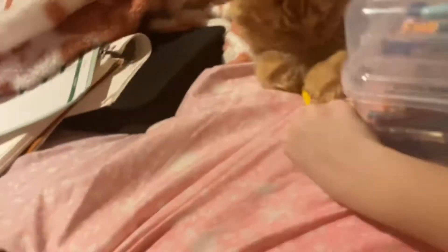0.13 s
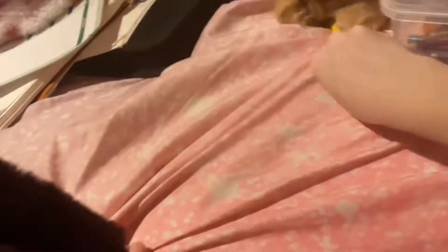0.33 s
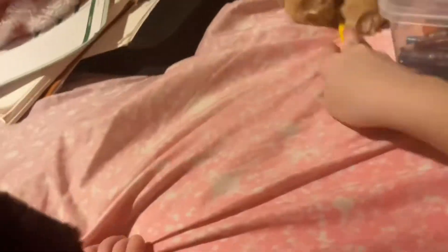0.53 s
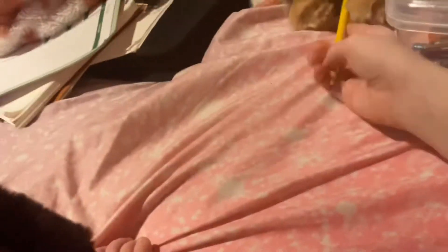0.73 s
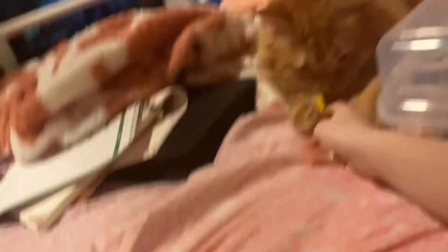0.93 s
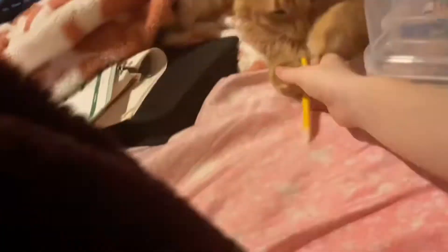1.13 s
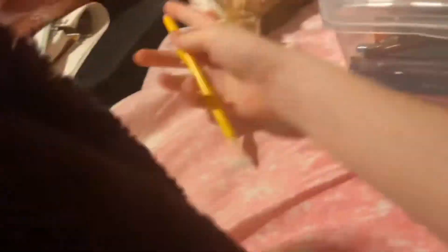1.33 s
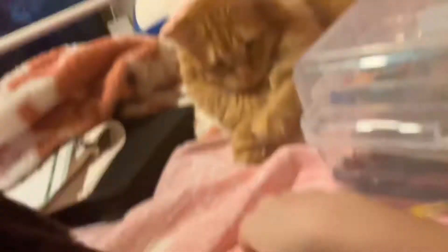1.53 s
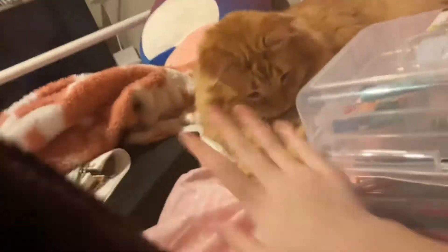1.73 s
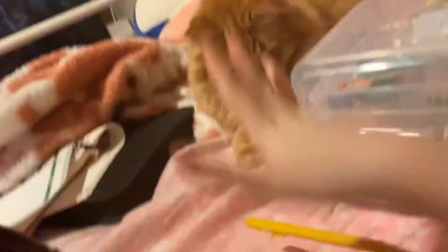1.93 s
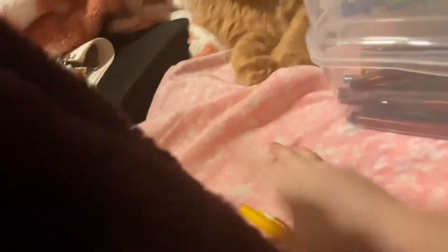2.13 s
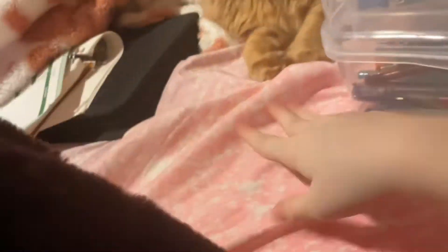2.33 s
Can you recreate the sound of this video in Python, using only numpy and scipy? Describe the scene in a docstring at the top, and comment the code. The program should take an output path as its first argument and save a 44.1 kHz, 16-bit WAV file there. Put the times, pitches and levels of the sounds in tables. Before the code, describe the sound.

A cat chirps twice amid hollow pops, soft pats and rustling bedding.

```python
"""A quiet bedroom with a faint hum, the microphone close to a cat on the bed. A hand and paws rustle
over the cloth after a pencil, with small clicks and hollow pops. Half a second in come the loudest pop
and a pat, then a bright swish and the cat's first whistle-like chirp, rising and falling. More pats,
pops and light swishes lead to a second, louder chirp at 1.7 s. The last soft pats land in the bedding
and the rustle dies away."""
import sys
import numpy as np
from scipy import signal
from scipy.fft import rfft, irfft
from scipy.io import wavfile

SR = 44100
rng = np.random.default_rng(int(sys.argv[2]) if len(sys.argv) > 2 else 0)


def file_out(sig):
    """Save sig as 16-bit WAV at sys.argv[1]."""
    # one column per channel
    cols = np.atleast_2d(sig).T
    # limit, then scale
    lim = np.clip(cols, -1, 1)
    pcm = np.round(lim * 32767).astype(np.int16)
    wavfile.write(sys.argv[1], SR, pcm)


N = 109941
T = np.arange(N) / SR

# The cat's two calls, close up: time_s, pitch_hz, level_db
FIRST_CHIRP = [(0.568, 1290, -50), (0.577, 1493, -44), (0.585, 1820, -43.5), (0.594, 1662, -28.5),
               (0.602, 1615, -28.5), (0.613, 1413, -31.5), (0.627, 1053, -45.5), (0.641, 1016, -42),
               (0.668, 1040, -67)]
SECOND_CHIRP = [(1.681, 1030, -43), (1.693, 1072, -29), (1.703, 1183, -34.5), (1.711, 1237, -53),
                (1.743, 1533, -55), (1.752, 1479, -25), (1.761, 1484, -21.5), (1.769, 1409, -27),
                (1.777, 1277, -27.5), (1.787, 1190, -56)]
# The mouth's resonances, shaping the overtones: frequency_hz, gain_db
MOUTH_RESONANCES = [(2200, -26), (2950, -7), (3300, -21.5), (4300, -30), (6500, -23.5), (8000, -40.5),
                    (10500, -28), (12000, -61.5)]

def cat_chirp(contour, bright_db, shut_s):
    """A nearly pure gliding tone; raspy overtones grow with effort and fade as the mouth shuts."""
    jitter, rasp = 0.008, 0.022   # shares of the pitch
    shimmer_db, flicker_db, closing_s = 0.8, 2.5, 0.018
    time_s, pitch_hz, _ = np.transpose(contour)
    pitch = np.interp(T, time_s, pitch_hz) * (1 + jitter * drift(200))
    phase = 2 * np.pi * np.cumsum(pitch) / SR
    raspy_phase = phase + 2 * np.pi * np.cumsum(pitch * rasp * drift(560)) / SR
    gain = envelope(contour) * from_db(shimmer_db * drift(80))
    overtones = np.zeros(N)
    for k in range(2, 9):
        mouth_db = np.interp(k * pitch, *np.transpose(MOUTH_RESONANCES))
        overtones += from_db(mouth_db + flicker_db * drift(93)) * np.sin(k * raspy_phase)
    opening = np.clip((shut_s - T) / closing_s, 0, 1)
    effort = gain / gain.max()
    brightness = from_db(bright_db) * opening * effort ** 0.3
    return np.sqrt(2) * gain * (np.sin(phase) + brightness * overtones)


# Hollow pops near the microphone: start_s, level_db, start_pitch_hz
POPS = [(0.158, -65, 900), (0.282, -41, 1526), (0.2958, -33, 1222), (0.3030, -37.5, 1590),
        (0.405, -44, 1430), (0.5271, -14, 1618), (0.731, -47, 1075), (0.791, -50, 1045),
        (0.9827, -24, 1392), (1.017, -40.5, 1236), (1.156, -46.5, 1245), (1.5922, -34, 1096),
        (1.6795, -35, 1356), (1.703, -34.5, 1660), (1.8329, -42, 742), (1.890, -50.5, 940),
        (1.9648, -38, 1456)]

def hollow_pops():
    """A resonance drops in pitch as it dies, with a crisp overtone, and sets a hollow body ringing."""
    attack_s, fall_s, decay_cycles = 0.0016, 0.00388, 4.54
    end_share = 0.257   # of the starting pitch
    body_band_hz = (522.5, 587.5)
    pops = np.zeros(N)
    for start_s, level_db, pitch_hz in POPS:
        age = np.maximum(T - start_s, 0)
        glide = (1 - end_share) * fall_s * (1 - np.exp(-age / fall_s))
        phase = 2 * np.pi * pitch_hz * (end_share * age + glide)
        shape = np.minimum(age / attack_s, 1) ** 2 * np.exp(-age * pitch_hz / decay_cycles)
        overtone = from_db(-24) * np.sin(2.4 * phase)
        pops += from_db(level_db) * shape * (np.sin(phase) + overtone)
    return pops + from_db(4) * butter(pops, body_band_hz, "band", order=1)


# Hand and paws landing on the bedding: start_s, thud_db, puff_db, tick_db
PATS = [(0.530, -42, -33, -44), (0.982, -38, -41.5, -71), (1.034, -53, -53.5, -55.5),
        (1.221, -71, -53, -58), (1.264, -53, -61, -60), (1.509, -43, -47, -69), (1.591, -41, -46.5, -48.5),
        (1.741, -47, -59, -48.5), (1.835, -51, -58, -65), (1.964, -33.5, -42.5, -45.5),
        (2.402, -42.5, -59, -91)]
# The mattress ringing under them: frequency_hz, gain_db, t60_s
MATTRESS_MODES = [(154.5, -3.5, 0.039), (186.7, 0.5, 0.053), (291.6, -1, 0.043), (454, -6.5, 0.035)]

def bedding_pats():
    """Each pat makes a soft tick of contact, a puff from the cloth and a thud in the mattress."""
    cushion_s, puff_decay_s, tick_decay_s = 0.0002, 0.013, 0.0059
    pushes, puff_gain, tick_gain = np.zeros((3, N))
    for start_s, thud_db, puff_db, tick_db in PATS:
        age = np.maximum(T - start_s, 0)
        rise = np.minimum(age / cushion_s, 1)   # the cloth softens the contact
        pushes[int(start_s * SR)] = from_db(thud_db)
        puff_gain += from_db(puff_db) * rise * np.exp(-age / puff_decay_s)
        tick_gain += from_db(tick_db) * rise * np.exp(-age / tick_decay_s)
    thud = sum((-1) ** k * from_db(gain_db) * ring(pushes, hz, t60_s)
               for k, (hz, gain_db, t60_s) in enumerate(MATTRESS_MODES))
    puff = puff_gain * band_noise((304, 1420), order=3)
    tick = tick_gain * band_noise((1400, 4100))
    return thud + puff + tick


# Quick strokes over the bedding, close up: time_s, level_db
FIRST_SWISH = [(0.535, -65), (0.57, -32.5), (0.628, -36.5), (0.68, -31.5), (0.698, -37.5), (0.725, -62)]
SECOND_SWISH = [(1.699, -89), (1.703, -45), (1.729, -36), (1.746, -51), (1.765, -59)]
LIGHT_SWISHES = [(1.204, -109.5), (1.228, -65), (1.26, -56.5), (1.298, -73), (1.33, -54), (1.36, -119),
                 (1.382, -61), (1.43, -86), (1.492, -69), (1.508, -51), (1.528, -41), (1.575, -64)]
# The spectra of those strokes: frequency_hz, relative_db
FIRST_START_COLOUR = [(500, -14.5), (2500, -19.5), (5500, -25), (6500, -4.5), (7300, -17), (9000, -2.5),
                      (11000, -20), (14000, -9), (15800, -3)]
FIRST_END_COLOUR = [(500, -14), (3500, -27.5), (6400, -9.5), (7050, -19.5), (8200, 2.5), (9300, -7.5),
                    (10200, 2), (15500, -4.5)]
SECOND_COLOUR = [(800, -8.5), (3400, -4), (4200, 3.5), (5000, -9.5), (6200, -5), (8200, -2.5), (9300, -9.5),
                 (10500, 6.5), (12800, -5), (14300, 9.5), (15600, -4.5)]
LIGHT_COLOUR = [(1000, -6.5), (4300, -9.5), (5400, 7), (7000, -7), (9200, 2.5), (11000, -9), (12500, 4.5),
                (14000, 1.5)]

def cloth_swishes():
    """Hand and paws brush the cloth in bright strokes; the first shifts colour along the way."""
    rub = cloth_friction(snap_share=0.17)
    shift = np.interp(T, (0.614, 0.654), (0, 1))
    first = (1 - shift) * coloured(rub, FIRST_START_COLOUR) + shift * coloured(rub, FIRST_END_COLOUR)
    swishes = envelope(FIRST_SWISH) * first
    for stroke, colour in (SECOND_SWISH, SECOND_COLOUR), (LIGHT_SWISHES, LIGHT_COLOUR):
        swishes += envelope(stroke) * coloured(cloth_friction(snap_share=0.17), colour)
    return butter(swishes, 300, "high")


def cloth_friction(snap_share):
    """Rubbed cloth: smooth hiss, with a share of the power in the snaps of single fibres."""
    fibres_per_s, spread_db = 5000, 4
    sizes = from_db(spread_db * np.minimum(rng.exponential(1, N), 5)) * rng.choice([-1, 1], N)
    snaps = unit_rms(sizes * (rng.random(N) < fibres_per_s / SR))
    return np.sqrt(snap_share) * snaps + np.sqrt(1 - snap_share) * rng.standard_normal(N)


# The bedding shifting softly beneath the strokes: time_s, level_db
RUSTLE = [(0.175, -90), (0.205, -58), (0.26, -53), (0.32, -61), (0.37, -77), (0.44, -74), (0.49, -55.5),
          (0.6, -52.5), (0.76, -69), (0.835, -73), (0.868, -58), (0.92, -60.5), (0.962, -87), (0.99, -57.5),
          (1.04, -60), (1.065, -65), (1.1, -61), (1.15, -69.5), (1.205, -77), (1.228, -58.5), (1.35, -69.5),
          (1.385, -58.5), (1.43, -81.5), (1.51, -62), (1.6, -53), (1.68, -59.5), (1.81, -71), (1.896, -56),
          (1.96, -61.5), (2.13, -63), (2.3, -58.5), (2.352, -78.5), (2.49, -69)]
# Its spectrum: frequency_hz, relative_db
RUSTLE_COLOUR = [(200, 4), (700, 8.5), (1800, 2), (3400, 0), (5000, -4), (8000, -4.5), (15500, -9)]

def cloth_rustle():
    """The cloth catches and slips in an uneven rustle that turns dull when it barely moves."""
    flutter_db, brisk_db = 2.0, -53
    motion = envelope(RUSTLE)
    rustle = motion * coloured(cloth_friction(snap_share=0.12), RUSTLE_COLOUR)
    rustle *= from_db(flutter_db * drift(58))
    briskness = np.minimum(motion / from_db(brisk_db), 1)
    dull = butter(rustle, 4200, "low", order=1)
    return briskness * rustle + (1 - briskness) * dull


# Claws and pencil, faint even this close: start_s, level_db
CLICKS = [(0.187, -59), (0.201, -54.5), (0.758, -57.5), (1.183, -71), (2.029, -56.5)]

def claw_and_pencil_clicks():
    """Small dry contacts give bright bursts that die at once."""
    decay_s = 0.0033
    bursts = sum(from_db(level_db) * (T > start_s) * np.exp(-np.abs(T - start_s) / decay_s)
                 for start_s, level_db in CLICKS)
    return bursts * band_noise((1950, 10600))


# Surfaces near the bed, heard just after the direct sound: delay_s, gain_db
REFLECTIONS = [(.0075, -15), (0.0185, -24.5)]

def bedroom_echo(direct):
    """The room returns two near reflections and a short tail, all dulled by the walls."""
    t60_s, tail_db, wall_cut_hz = 0.18, -27, 5600
    near = sum(from_db(gain_db) * np.interp(T - delay_s, T, direct, left=0)
               for delay_s, gain_db in REFLECTIONS)
    tail = rng.standard_normal(N) * from_db(-60 * T / t60_s) * (T > 0.005)
    far = signal.fftconvolve(direct, tail / np.linalg.norm(tail))[:N]
    return butter(near + from_db(tail_db) * far, wall_cut_hz, "low")


# The bedroom's own air, all around the microphone: frequency_hz, relative_db
ROOM_TONE_COLOUR = [(80, -53.5), (135, 2), (340, 4.5), (420, -4.5), (560, -0.5), (1000, -8.5),
                    (1400, -14.5), (2300, -24), (15000, -31.5)]

def room_tone():
    """Dull, steady noise and a slightly wavering hum swell together over the first second."""
    hum_hz, hum_db, waver_db, air_db, swell_db = 322.6, -63, 1.04, -65, 4.5
    hum = np.sqrt(2) * from_db(hum_db + waver_db * drift(6.2)) * np.sin(2 * np.pi * hum_hz * T)
    air = from_db(air_db) * coloured(rng.standard_normal(N), ROOM_TONE_COLOUR)
    swell = from_db(-swell_db * np.maximum(1 - T, 0))
    return swell * (hum + air)


def from_db(db):
    """Decibels to gain."""
    return 10 ** (np.asarray(db) / 20)


def unit_rms(x):
    """Scale to unit power."""
    return x / np.sqrt(np.mean(x ** 2) + 1e-20)


def envelope(rows):
    """Gain from rows that begin with time_s and end with level_db; silent outside them."""
    rows = np.array(rows)
    return from_db(np.interp(T, rows[:, 0], rows[:, -1], left=-150, right=-150))


def butter(x, hz, kind, order=2):
    """Causal Butterworth filter."""
    return signal.sosfilt(signal.butter(order, hz, kind, fs=SR, output="sos"), x + 1e-18)


def band_noise(band_hz, order=2):
    """Noise in one band, at unit power."""
    return unit_rms(butter(rng.standard_normal(N), band_hz, "band", order))


def drift(hz):
    """Random wander up to about this rate, at unit power."""
    return unit_rms(butter(rng.standard_normal(N + SR), hz, "low")[SR:])


def coloured(x, spectrum):
    """Shape a sound by a spectrum, at unit power."""
    hz, db = np.transpose(spectrum)
    bins_hz = np.maximum(np.fft.rfftfreq(N, 1 / SR), 1)
    gain = from_db(np.interp(np.log(bins_hz), np.log(hz), db))
    return unit_rms(irfft(rfft(x) * gain, N))


def ring(pushes, hz, t60_s):
    """A unit push starts a decaying sine of height 1."""
    decay, step = from_db(-60 / (t60_s * SR)), 2 * np.pi * hz / SR
    return signal.lfilter([0, np.sin(step)], [1, -2 * decay * np.cos(step), decay ** 2], pushes + 1e-18)


def scene():
    """One microphone by the bed: cat and bedding close, their deep bass cut, the room faint behind."""
    chirps = cat_chirp(FIRST_CHIRP, bright_db=-0.5, shut_s=0.6136)
    chirps += cat_chirp(SECOND_CHIRP, bright_db=-5.5, shut_s=1.779)
    direct = chirps + hollow_pops() + bedding_pats() + claw_and_pencil_clicks()
    foreground = direct + bedroom_echo(direct) + cloth_swishes() + cloth_rustle()
    return (butter(foreground, 132, "high", order=6) + room_tone())[None]


def record(dry):
    """The microphone's signal is cut steeply at the very top of the treble."""
    cutoff_hz = 15900
    return signal.sosfilt(signal.ellip(12, 0.1, 80, cutoff_hz, fs=SR, output="sos"), dry)


dry = scene()
out = record(dry)
file_out(out)
```